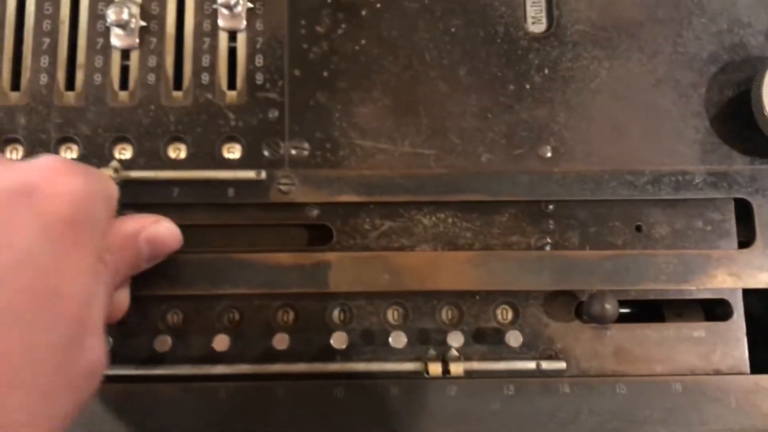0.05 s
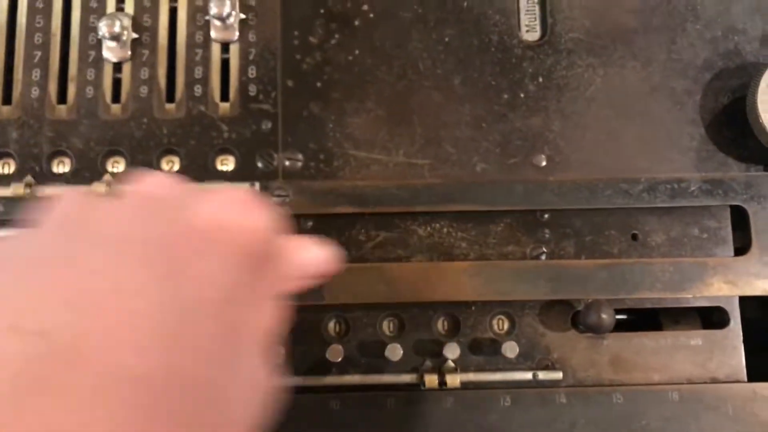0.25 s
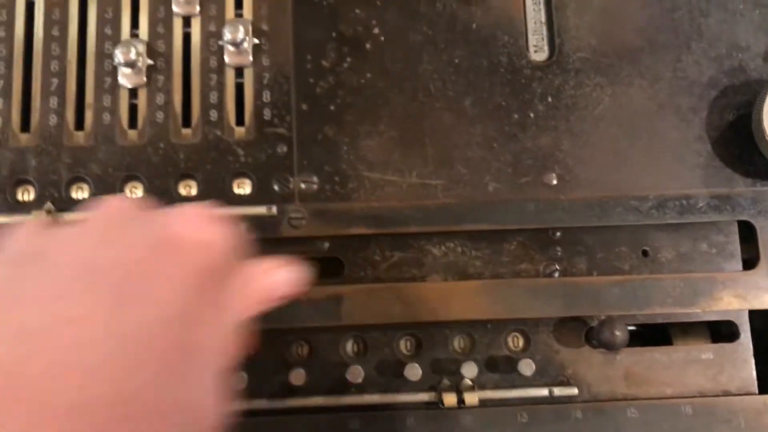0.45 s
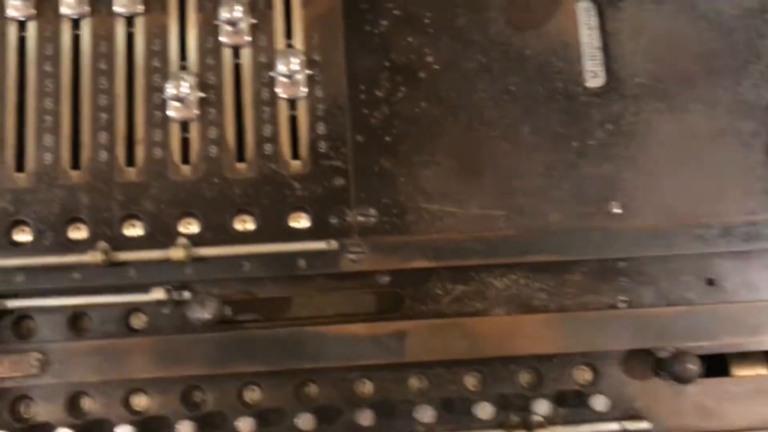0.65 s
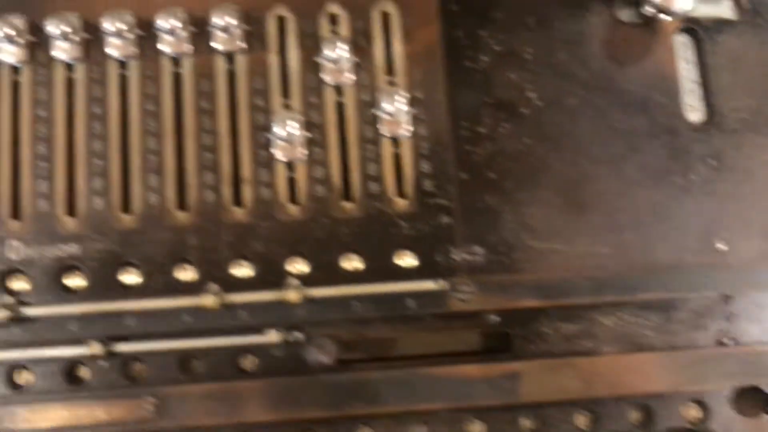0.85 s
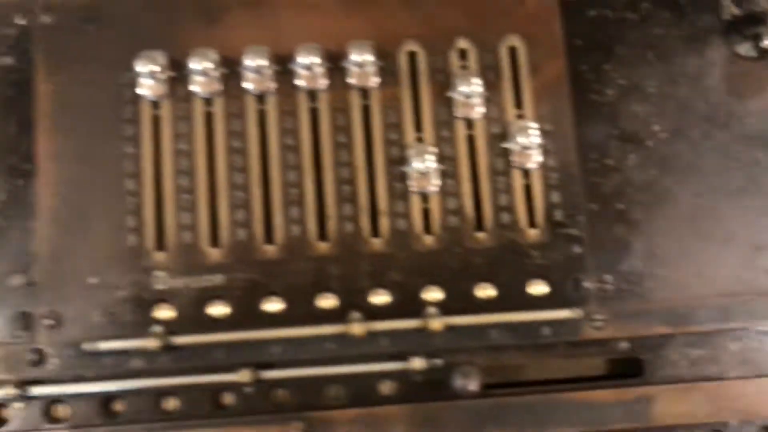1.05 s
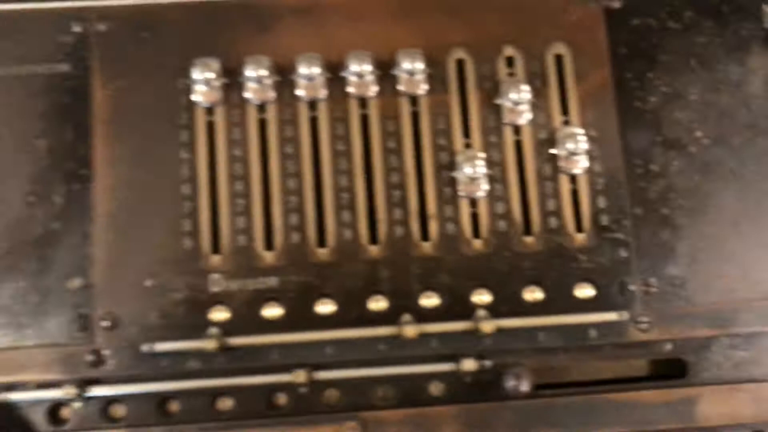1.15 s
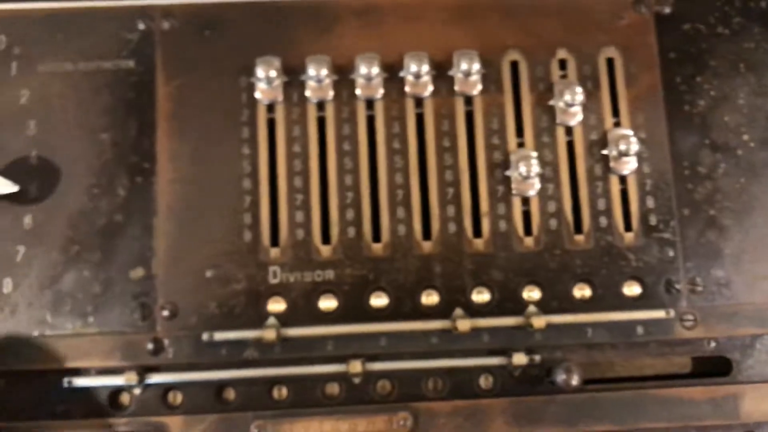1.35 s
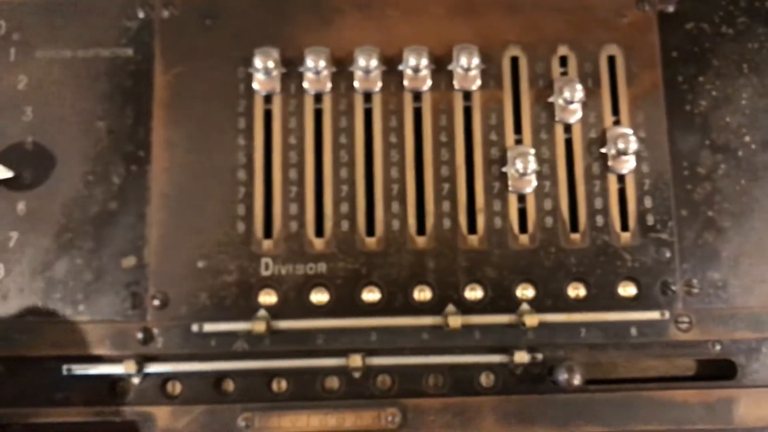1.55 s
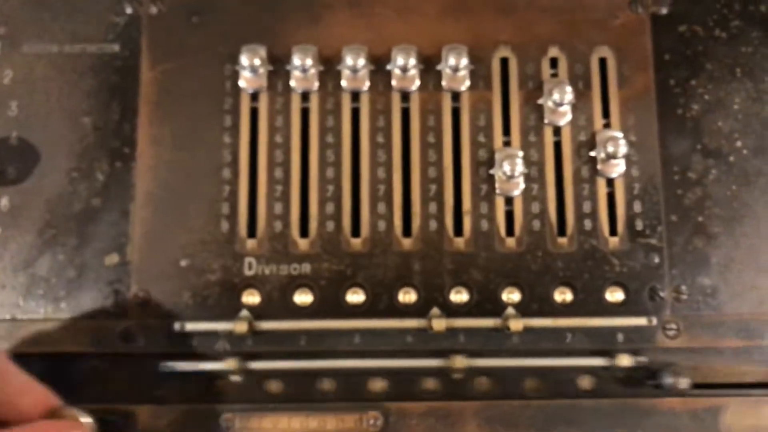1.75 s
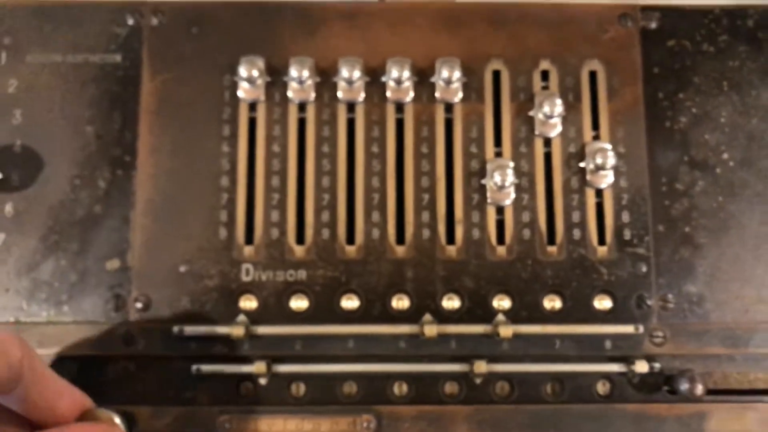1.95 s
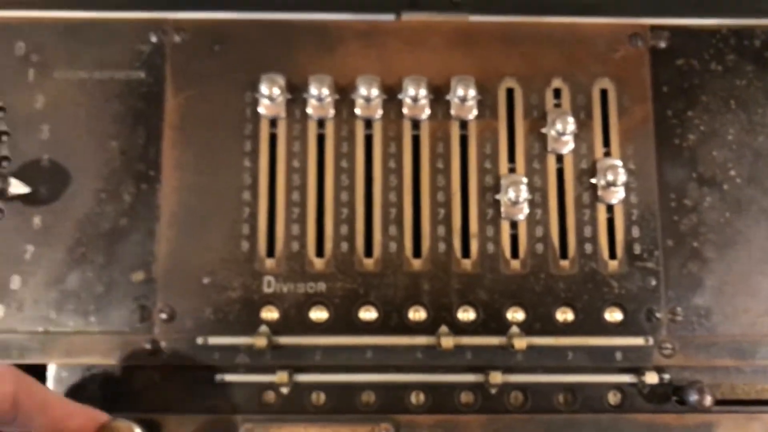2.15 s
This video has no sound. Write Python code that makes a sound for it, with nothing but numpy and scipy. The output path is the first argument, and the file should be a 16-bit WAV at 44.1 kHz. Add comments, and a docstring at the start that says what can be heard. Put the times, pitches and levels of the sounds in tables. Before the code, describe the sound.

Sharp metal clacks come from a hand-worked mechanical calculator, heard close in a quiet room. A sliding control knocks against its stops, faint ticks follow, then the carriage lands with a heavy double clack and settles lightly.

```python
"""An old mechanical calculator, worked by hand in a small, quiet room with mains hum and a thin tone.
0.1-0.55 s: a control rubs along its slot and clacks against its stops; the hollow case booms.
From 0.7 s: faint ticks. 1.47 s: the carriage is nudged, then bumps along.
1.83 s: it drops home with a double clack, shaking the table and leaving small steel parts ringing.
2.1 s: it settles with a lighter clack."""
import sys
import numpy as np
from scipy import signal
from scipy.fft import rfft, irfft
from scipy.io import wavfile
from scipy.ndimage import uniform_filter1d

SR = 44100
rng = np.random.default_rng(int(sys.argv[2]) if len(sys.argv) > 2 else 0)


def file_out(sig):
    """Save sig as 16-bit WAV at sys.argv[1]."""
    # one column per channel
    cols = np.atleast_2d(sig).T
    # limit, then scale
    lim = np.clip(cols, -1, 1)
    pcm = np.round(lim * 32767).astype(np.int16)
    wavfile.write(sys.argv[1], SR, pcm)


N = 97020
TIME_S = np.arange(N) / SR

# control rattling, striking its stops: start_s, frame_db, tilt_db_per_octave, modes_db
CONTROL_HITS = [(.1118, -36.5, 2.4, -39.5), (.134, -52, -4, -46), (0.1954, -49, 3, -56),
                (0.1982, -39, 1.5, -54), (.2135, -36, 4.5, -55), (.2203, -24, 5.5, -47),
                (.2355, -23, 7.9, -22), (.246, -21.5, 2.2, -28), (.2929, -14, 3.1, -12.5),
                (.3012, -21.5, -3, -23.5), (.5138, -23, 3.5, -18), (.5195, -17.5, 8, -18.5),
                (.5232, -12, 1.5, -29.5), (.5255, -15.5, -0.9, -10), (.529, -23.5, -1.5, -20),
                (.5445, -32, -5.5, -30.5)]
# carriage nudged, dropping home, settling: start_s, frame_db, tilt_db_per_octave, modes_db
CARRIAGE_HITS = [(1.459, -46, 0, -52), (1.467, -47.5, 0, -39.5), (1.4748, -36, -0.99, -40),
                 (1.6721, -50, 0.14, -47), (1.7525, -45, -1.7, -48.5), (1.8229, -26, -2.1, -40),
                 (1.8265, -17.5, -1.5, -17.5), (1.8311, -15, 0.52, -12), (1.8388, -16.5, 0.0078, -11),
                 (1.8526, -12, 0.3, -14.5), (1.8657, -22.5, -1.1, -41), (1.8791, -34, -2, -31),
                 (2.0915, -32, -0.036, -45.5), (2.096, -35.5, 0.043, -35), (2.104, -36, -0.6, -44.5),
                 (2.191, -51, 0.12, -65)]


def from_db(db):
    return 10 ** (np.asarray(db) / 20)


def unit_rms(x):
    return x / np.sqrt(np.mean(x ** 2) + 1e-20)


def at_hz(points, hz):
    """Interpolate (freq_hz, value) points on a log-frequency axis."""
    freq_hz, value = np.transpose(points)
    return np.interp(np.log(hz), np.log(freq_hz), value)


def envelope(points):
    """Gain over time from (time_s, level_db) points."""
    return from_db(np.interp(TIME_S, *np.transpose(points)))


def low_cut(x, hz):
    return signal.sosfilt(signal.butter(2, hz, "high", fs=SR, output="sos"), x)


def clicks(times_s, sizes):
    out = np.zeros(N)
    np.add.at(out, np.clip((np.asarray(times_s) * SR).astype(int), 0, N - 1), sizes)
    return out


def ring(x, hz, t60_s):
    """One mode: a unit click starts a decaying tone of height 1."""
    radius = np.exp(-np.log(1000) / (t60_s * SR))
    step_rad = 2 * np.pi * hz / SR
    return signal.lfilter([.5, 0, -.5], [1, -2 * radius * np.cos(step_rad), radius ** 2], x + 1e-18)


def leak(energy, t60_s):
    """Stored energy decays exponentially."""
    return signal.lfilter([1], [1, -np.exp(-2 * np.log(1000) / (t60_s * SR))], energy + 1e-18)


def noise_bands():
    """White noise in third octaves: yields centre_hz, samples."""
    edges_hz = np.geomspace(70, 17800, 25)
    white = rng.standard_normal((2, N))
    for k, (low, high) in enumerate(zip(edges_hz, edges_hz[1:])):
        band = signal.butter(2, [low, high], "band", fs=SR, output="sos")
        yield np.sqrt(low * high), signal.sosfilt(band, white[k % 2])


def soft_blow(start_s, level_db, modes, rise_s):
    """Cushioned blow: the modes swell, then decay."""
    age_s = np.maximum(TIME_S - start_s, 0)
    tones = 0
    for hz, gain_db, t60_s in modes:
        decay = np.exp(-np.log(1000) * age_s / t60_s)
        tones += from_db(level_db + gain_db) * decay * np.sin(2 * np.pi * hz * age_s)
    return tones * (1 - np.exp(-(age_s / rise_s) ** 2))


def struck(hits, modes):
    """Hard hits: each rings every mode, with random scatter in strength."""
    start_s, _, _, modes_db = np.transpose(hits)
    scatter_db = 4 * rng.standard_normal((len(start_s), len(modes)))
    out = 0
    for k, (hz, gain_db, t60_s) in enumerate(modes):
        blows = clicks(start_s, from_db(modes_db + gain_db + scatter_db[:, k]))
        out += (-1) ** k * ring(blows, hz, t60_s)
    return out


def background():
    """Room noise, mains hum and a thin tone that grows until 1.8 s, then recedes."""
    # room noise spectrum: freq_hz, gain_db
    air_colour = [(25, -14.5), (50, -12.5), (80, 0), (130, 7), (190, -5.5), (290, 3), (400, -3.5),
                  (540, -10), (800, -13), (1350, -8), (1900, -15.5), (3000, -14.5), (4500, -22.5),
                  (8500, -24), (12000, -39.5), (16000, -47.5)]
    # steady tones: pitch_hz, rms_db
    hum_tones = [(120, -52.5), (291, -65), (737, -75.5), (829, -74), (1340, -74), (3009, -81)]
    # thin tone: time_s, rms_db
    tone_levels = [(0, -86), (.6, -77), (.85, -71.5), (1.05, -65.5), (1.5, -63), (1.8, -60), (2.2, -71.5)]
    hz = np.maximum(np.fft.rfftfreq(N, 1 / SR), 1)
    air = irfft(rfft(rng.standard_normal(N)) * from_db(at_hz(air_colour, hz)), N)
    hum = sum(from_db(db) * np.sin(2 * np.pi * (f * TIME_S + rng.random())) for f, db in hum_tones)
    thin_tone = envelope(tone_levels) * np.sin(2 * np.pi * 2218 * TIME_S)
    return from_db(-58) * unit_rms(air) + np.sqrt(2) * (hum + thin_tone)


def room(x, gain_db=-15.5, delay_s=0.0087):
    """Short diffuse tail of the small room."""
    # room decay: freq_hz, t60_s
    decay = [(150, 0.26), (1000, 0.22), (5000, 0.24), (15000, 0.15)]
    tail = sum(noise * np.exp(-np.log(1000) * TIME_S / at_hz(decay, hz)) for hz, noise in noise_bands())
    tail *= TIME_S > delay_s
    return from_db(gain_db) * signal.fftconvolve(x, tail / np.sqrt(np.sum(tail ** 2)))[:N]


def table_rumble(band_hz=(46, 83)):
    """The table rumbles under the moving carriage."""
    # rumble: time_s, rms_db
    levels = [(1.69, -85), (1.73, -53.5), (1.84, -59), (1.89, -35), (2.0, -49.5), (2.1, -52.5), (2.2, -58)]
    band = signal.butter(2, band_hz, "band", fs=SR, output="sos")
    return envelope(levels) * unit_rms(signal.sosfilt(band, rng.standard_normal(N)))


def thuds(bump_t60_s=0.06):
    """The hollow case booms, the carriage bumps, the table shudders."""
    # blows to the case: start_s, level_db
    case_blows = [(.208, -37.5), (.243, -31), (.295, -21.5), (1.473, -30.5), (1.755, -33), (1.83, -19),
                  (2.095, -40)]
    # case resonances: pitch_hz, gain_db, t60_s
    case_modes = [(239, -2.5, 0.16), (274.4, 5, .14), (324.6, -10.5, 0.32)]
    # dull carriage bumps: start_s, level_db, pitch_hz
    carriage_bumps = [(1.670, -28.5, 280), (1.679, -24.5, 321), (1.687, -31.5, 142), (1.752, -20, 223),
                      (1.757, -35, 380), (1.772, -21.5, 333), (1.777, -57, 182), (1.828, -15, 406),
                      (1.832, -15.5, 202), (1.838, -17.5, 143), (1.845, -15.5, 324), (1.868, -19.5, 345),
                      (1.885, -27, 177)]
    # table shudders: start_s, level_db, rise_s
    shudders = [(0.544, -38.5, 0.014), (1.713, -27.5, 0.019), (1.858, -33, 0.0099)]
    # table resonances: pitch_hz, gain_db, t60_s
    table_modes = [(58.3, -6.5, 0.13), (69.6, -12.5, 0.7)]
    case = sum(soft_blow(s, db, case_modes, rise_s=0.011) for s, db in case_blows)
    bumps = sum(soft_blow(s, db, [(hz, 0, bump_t60_s)], rise_s=0.0021) for s, db, hz in carriage_bumps)
    table = sum(soft_blow(s, db, table_modes, rise_s) for s, db, rise_s in shudders)
    return case + bumps + table


def steel_parts():
    """Springs and pins ring on after the blows."""
    # ringing parts: start_s, pitch_hz, level_db, t60_s
    rings = [(0.1124, 1367, -48.5, .07), (0.294, 14530, -30, 0.12), (.5255, 14700, -29, 0.13),
             (1.467, 2187, -40, 0.14), (1.467, 1074, -46, 0.16), (0.525, 1114, -23.5, 0.0976),
             (1.8303, 1084, -22.5, 0.13), (2.096, 1144, -51, 0.19), (1.8532, 6541, -49.5, 0.99),
             (1.8532, 11670, -38, 0.45), (1.852, 11860, -24.5, 0.12), (1.8513, 2565, -52, 0.55),
             (2.0941, 2564, -50, 0.3), (2.0925, 2088, -48.5, 0.22)]
    return sum(ring(clicks([s], from_db([db])), hz, t60_s) for s, hz, db, t60_s in rings)


def frame(grains_per_s=3400, crack_db=-4, tilt_pivot_hz=5000):
    """Hits, rubbing and ticks feed the frame's dense modes; hits die faster in the treble."""
    # frame spectrum: freq_hz, density_db
    frame_colour = [(100, -26), (190, -11.5), (270, -1.5), (420, -4), (540, -14.5), (700, -2.5), (1250, 2),
                    (1750, -0.5), (2300, 2), (3300, -0.5), (4400, 3), (5700, 2.5), (7800, -0.5),
                    (9400, 0.5), (11200, -5.5), (13500, -2.5), (15500, -10.5)]
    # frame decay: freq_hz, t60_s
    decay = [(200, 0.13), (1200, 0.096), (5000, 0.057), (15000, 0.071)]
    # control rubbing along its slot: time_s, level_db
    slide_levels = [(.19, -61), (.21, -38.5), (.228, -34), (.243, -24), (.255, -28.5), (.266, -51),
                    (.285, -71), (.49, -83), (.503, -39), (.513, -49), (.52, -74)]
    # rubbing spectrum: freq_hz, gain_db
    slide_colour = [(200, -12), (500, -7), (1300, 3), (2800, -11), (4000, -1.5), (7000, -3), (11000, -2.5),
                    (15000, -0.5)]
    # faint ticks, each trailing off in a rustle: start_s, level_db
    tick_events = [(.688, -65.5), (0.8787, -60), (1.071, -61), (1.262, -60), (1.556, -66.5),
                   (1.6467, -58.5), (2.031, -63)]
    # tick spectrum: freq_hz, gain_db
    tick_colour = [(1000, 4.5), (4500, -8.5), (8500, 7), (12000, -1.5), (16000, 5)]
    hit_s, hit_db, tilt_db_per_octave, _ = np.transpose(CONTROL_HITS + CARRIAGE_HITS)
    tick_s, tick_db = np.transpose(tick_events)
    grains = (rng.random(N) < grains_per_s / SR) * rng.exponential(1, N)
    grit = uniform_filter1d(grains * SR / grains_per_s, size=40).clip(0)   # mean near 1
    rubbing = grit * envelope(slide_levels) ** 2
    ticks = grit * leak(clicks(tick_s, from_db(tick_db) ** 2), t60_s=0.42)
    out = 0
    for hz, noise in noise_bands():
        octaves = np.log2(hz / tilt_pivot_hz)
        blows = clicks(hit_s, from_db(hit_db + tilt_db_per_octave * octaves) ** 2)
        energy = leak(blows, at_hz(decay, hz))
        energy += from_db(crack_db) ** 2 * leak(blows, t60_s=0.011)   # crack at first contact
        energy += rubbing * from_db(at_hz(slide_colour, hz)) ** 2
        energy += ticks * from_db(at_hz(tick_colour, hz)) ** 2
        out += noise * from_db(at_hz(frame_colour, hz)) * np.sqrt(energy)
    return out


def control():
    """The control rings as it rattles and hits its stops."""
    # control resonances: pitch_hz, gain_db, t60_s
    modes = [(405, -23.5, 0.18), (663, -19.5, 0.14), (813, -21, 0.085), (1030, -18, .09), (1176, -24, .1),
             (1263, -14.5, 0.099), (1386, -17, 0.089), (1474, -18.5, 0.11), (1940, -19, .085),
             (2099, -18.5, 0.076), (2215, -20.5, 0.14), (3050, -23, 0.12), (3704, -23, .11),
             (4620, -22.5, 0.064), (5400, -23, 0.098), (5500, -16.5, 0.073), (7000, -22, .07),
             (9380, -21.5, .06), (11200, -23.5, 0.084)]
    return struck(CONTROL_HITS, modes)


def carriage():
    """The carriage rings as it is nudged, drops home and settles."""
    # carriage resonances: pitch_hz, gain_db, t60_s
    modes = [(428, -23.5, 0.082), (676, -18, 0.228), (833, -18, 0.19), (1082, -16, 0.055),
             (1352, -17, 0.14), (1408, -17, .15), (1490, -35, 0.15), (2074, -18.5, 0.081),
             (2153, -18, 0.11), (2578, -9, 0.047), (3780, -23, 0.089), (4305, -14, 0.049),
             (4440, -16, 0.043), (5890, -17.5, 0.066), (7140, -28, 0.099), (8100, -20, 0.078),
             (9940, -12.5, 0.055)]
    return struck(CARRIAGE_HITS, modes)


def scene():
    """The machine on its table, in the room; mono."""
    clacks, lows = frame(), thuds()
    ringing = low_cut(control() + carriage() + steel_parts(), hz=260)
    tail = room(clacks + from_db(-6) * ringing + from_db(1.5) * lows)
    return (clacks + ringing + lows + tail + table_rumble() + background())[None]


def record(dry, cutoff_hz=16100):
    """The microphone thins the deepest bass; the top is cut steeply."""
    high_cut = signal.ellip(10, .2, 80, cutoff_hz, fs=SR, output="sos")
    return signal.sosfilt(high_cut, low_cut(dry, hz=38))


dry = scene()
out = record(dry)
file_out(out)
```